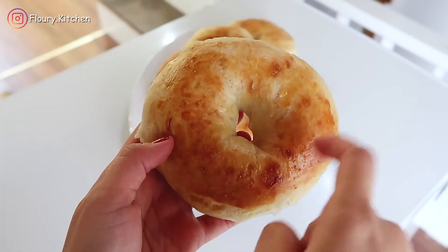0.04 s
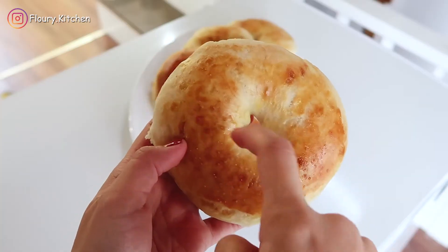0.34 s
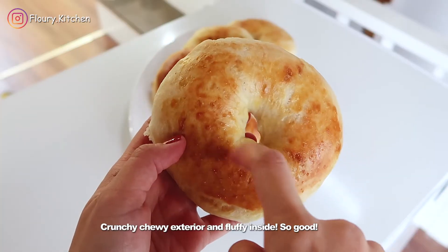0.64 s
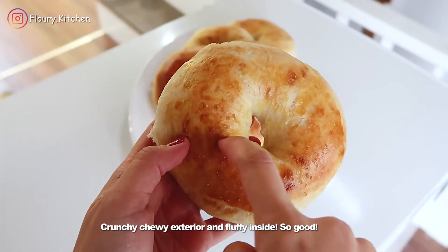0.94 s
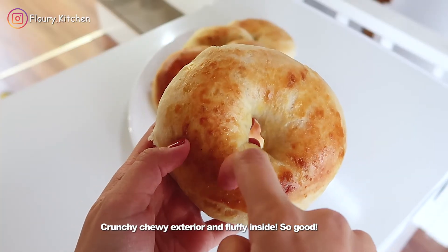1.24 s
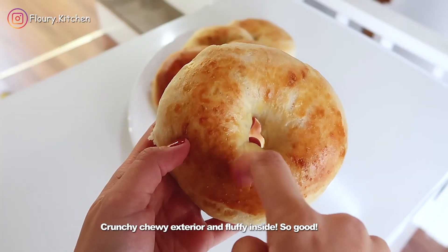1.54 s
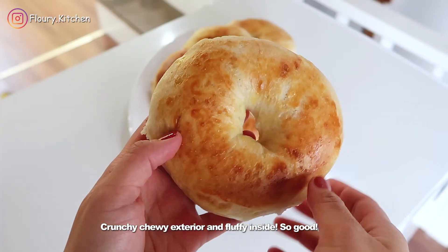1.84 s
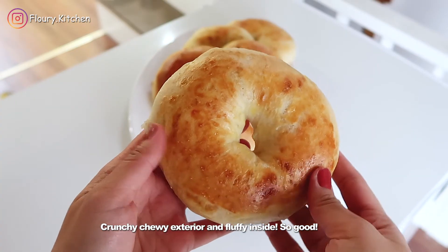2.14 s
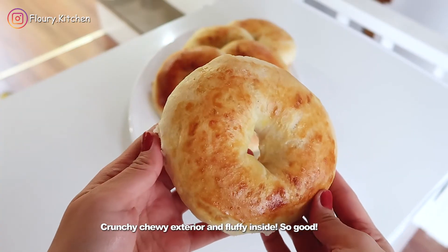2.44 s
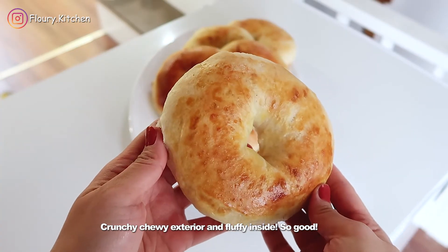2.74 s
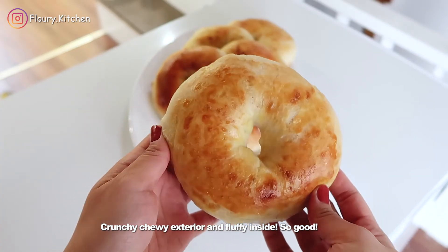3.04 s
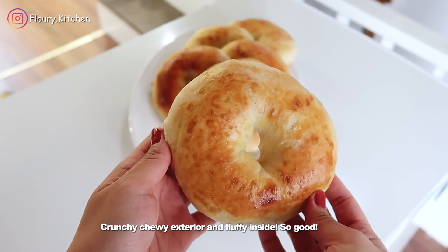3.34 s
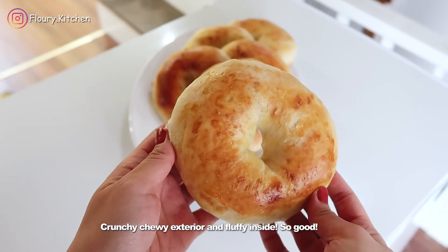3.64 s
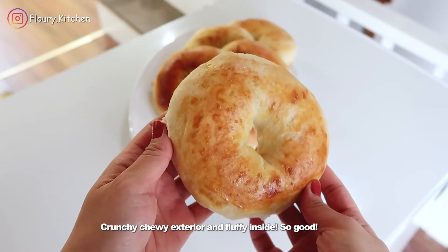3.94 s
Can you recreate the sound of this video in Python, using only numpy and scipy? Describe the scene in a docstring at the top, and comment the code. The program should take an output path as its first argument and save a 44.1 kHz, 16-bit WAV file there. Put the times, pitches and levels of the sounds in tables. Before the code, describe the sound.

Close-up tapping and scratching on a crusty bagel: two soft knocks come first, followed by quick, crackly fingernail strokes. These stop halfway through, leaving a quiet kitchen's low motor hum and soft rush of air.

```python
"""Two dull fingertip knocks on a hand-held bagel, then short, crisp flicks of a nail across its crust.
Each knock is one push that sets the soft crumb ringing. The nail catches and slips on the crust,
and now and then a flake snaps with a sharp click. A quiet kitchen answers faintly,
over a bed of appliance motor hum and a soft rush of air."""
import sys
import numpy as np
from scipy import signal
from scipy.fft import rfft, irfft, next_fast_len
from scipy.io import wavfile
from scipy.ndimage import map_coordinates

SR = 44100
rng = np.random.default_rng(int(sys.argv[2]) if len(sys.argv) > 2 else 0)


def to_wav(sig):
    """Store sig (one row per channel, or 1-D mono) as 16-bit WAV at the path in sys.argv[1].

    Samples outside -1..1 are clipped; the rate is SR.
    """
    pcm = np.clip(np.atleast_2d(sig), -1, 1) * 32767
    pcm = np.round(pcm).astype(np.int16)
    wavfile.write(sys.argv[1], SR, pcm.T)  # frames by channels


N = 176400

# Fingertip knocks. Each row: start in seconds, relative level in dB, brightness in dB per octave.
KNOCK_CUES = [(0.0028, -21, 0.5), (0.1835, -18.5, 0.5)]
# Tone of the fingertip's push. Each row: frequency in Hz, relative level in dB.
KNOCK_EQ = [(40, -20), (130, -1), (300, 9), (550, -1), (900, -0.5), (1500, -13), (3000, -16), (6000, -32),
            (14000, -46)]
# The bagel's modes. Each row: pitch in Hz, relative level in dB, seconds to fade by 60 dB.
CRUMB_MODES = [(198, -41, .06), (350, -34, 0.023), (515, -45, 0.042), (663, -41, 0.055), (850, -39, .06),
               (1450, -42, 0.042)]

# Nail strokes. Each row: firmest moment in seconds, rise and fall in seconds, level in dB,
# brightness in dB per octave, local crust resonance in Hz.
SCRATCH_CUES = [ (0.031, 0.01, 0.017, -39.5, -2, 704), (0.2221, 0.014, 0.012, -39, 0, 2730),
                (0.589, 0.037, 0.017, -48, 3, 1310), (0.613, 0.019, 0.028, -42.5, -0.5, 800),
                (0.632, 0.008, 0.019, -46, -1, 706), (0.867, 0.0084, 0.024, -43, 2.5, 2500),
                (0.886, 0.013, 0.034, -35, 0, 890), (1.011, .014, .016, -42.5, 1, 1400),
                (1.022, .012, 0.01, -42.5, .5, 1000), (1.108, 0.025, .014, -42.5, 1.5, 795),
                (1.121, .008, 0.022, -40.5, 0, 814), (1.289, 0.0049, 0.017, -40, 2, 1400),
                (1.306, 0.023, 0.036, -38.5, 1, 580), (1.423, 0.0045, .020, -40, -0.7, 970),
                (1.494, 0.021, 0.011, -40.5, 3.5, 1280), (1.504, 0.014, 0.015, -36, -0.3, 1100),
                (1.641, .005, 0.027, -47, 1.5, 1200), (1.663, 0.017, 0.022, -39, -0.05, 1660),
                (1.863, 0.0083, 0.022, -44.5, 2, 795), (1.879, 0.024, 0.018, -48, 3, 1670)]
# Tone of the crust. Each row: frequency in Hz, relative level in dB.
CRUST_EQ = [(60, -18.5), (150, -4), (280, 4.5), (550, -0.5), (880, -1), (1300, -1), (1960, -7.5),
            (2850, -10.5), (3650, -16), (4700, -16.5), (6000, -20.5), (8500, -29), (12400, -31.5),
            (15000, -43)]
# Snapping flakes. Each row: start in seconds, relative level in dB, brightness in dB per octave.
SNAP_CUES = [(0.216, -16.5, -3), (0.2211, -19.5, -2), (0.5897, -27, 1.5), (0.6123, -23.5, -4.5),
             (0.6328, -34, 1), (0.8795, -45, -3), (0.888, -31, 6), (0.8942, -23.5, 4), (1.0159, -22.5, 0),
             (1.0235, -30, -1.5), (1.0251, -25.5, 1.5), (1.0896, -21, -1.5), (1.1072, -32, 5.5),
             (1.1209, -30, 0), (1.278, -42, 14), (1.289, -27, 1.5), (1.3034, -19, 1), (1.307, -18.5, 3),
             (1.3357, -23, -8), (1.4203, -24.5, 2), (1.503, -23.5, 1.5), (1.6612, -25, -1.5),
             (1.664, -21.5, -.5), (1.6673, -37, 2)]
# The crust's bending resonances. Each entry: frequency in Hz.
BENDING_HZ = [2100, 2900, 3860, 5200, 6500, 7950, 10000]

# The kitchen's reverb tail. Each row: frequency in Hz, seconds to fade by 60 dB.
ROOM_DECAY = [(150, 0.33), (800, 0.56), (2500, 0.27), (10000, 0.12)]
# Lingering resonances of the surroundings. Each row: pitch in Hz, peak gain in dB.
ROOM_MODES = [(569, -5), (780, -2), (850, -4), (961, -5), (1186, -4), (1443, -5), (1607, 0), (1738, -5),
              (1998, -4)]
# The motor's tones. Each row: pitch in Hz, level in dB.
MOTOR_TONES = [(32.3, -73), (59.2, -49.5), (91.5, -64), (118.4, -70), (177.6, -72), (236.9, -58.5),
               (269.2, -73), (355.3, -72.5), (414.5, -73)]
# Slow swell of the hum. Each row: time in seconds, level in dB (only its offset from the mean counts).
MOTOR_SWELL = [(0.0, -52), (0.04, -49), (0.71, -48.5), (1.46, -50), (2.39, -49.5), (3.2, -49.5),
               (3.97, -49), (4.0, -48.5)]
# Tone of the air. Each row: frequency in Hz, relative level in dB.
AIR_EQ = [(20, -14.5), (45, 0), (80, -5.5), (130, -1), (200, 0.5), (320, 2), (450, -0.5), (650, -4.5),
          (900, -5), (1500, -7.5), (2500, -11), (4000, -14.5), (5200, -17), (8000, -22.5), (12000, -27.5),
          (14000, -31.5), (15000, -49)]
# Stereo image of the air. Each row: frequency in Hz, left-right correlation (1 is mono).
AIR_CORRELATION = [(60, 0.99), (150, 0.56), (300, 0.15), (600, 0.084), (1500, 0.05), (4000, 0.05),
                   (12000, 0.041)]


def knocks():
    """The fingertip gives one dull push; the soft crumb rings briefly."""
    out, t = np.zeros(N), np.arange(SR // 8) / SR
    for start, db, tilt_db in KNOCK_CUES:
        push = click(lambda hz: curve_at(KNOCK_EQ, hz) + tilt_db * octaves(hz))
        crumb = sum(amp(level - 60 * t / t60) * np.sin(2 * np.pi * hz * t)
                    for hz, level, t60 in CRUMB_MODES)
        add(out, start, amp(db + 8.5) * push)
        add(out, start, amp(db) * crumb)
    return out


def scratches(edge_db=18.5, ring_db=5, ring_octaves=0.22, grit_db=-10.5, grit_tilt_db=2):
    """The nail sticks and slips, with fine grit between, as its pressure rises and falls."""
    out, t = np.zeros(N), np.arange(-SR // 10, SR // 10) / SR
    for firmest, rise, fall, db, tilt_db, ring_hz in SCRATCH_CUES:
        def tone(hz):
            ring = ring_db / (1 + (octaves(hz, ring_hz) / ring_octaves) ** 2)
            return curve_at(CRUST_EQ, hz) + tilt_db * octaves(hz) + ring

        pressure = amp(-edge_db * np.maximum(-t / rise, t / fall))
        slips = pressure * nail_slips(t)
        rubbing = pressure * unit_rms(rng.standard_normal(len(t)))
        rasp = signal.fftconvolve(slips, click(lambda hz: tone(hz) + contact_rolloff(hz)))
        grit = signal.fftconvolve(rubbing, click(lambda hz: tone(hz) + grit_tilt_db * octaves(hz)))
        add(out, firmest + t[0], amp(db) * (amp(grit_db) * grit - rasp))
    return out


def nail_slips(t, count=160, slips_per_s=600, scatter=0.4, spread_db=4.5):
    """The nail lets go in a run of tiny jolts, uneven in timing and strength."""
    jitter, sizes = rng.standard_normal((2, count))
    when = (np.arange(count) - count / 2 + scatter * jitter) / slips_per_s
    strength = amp(spread_db * np.minimum(sizes, 1))
    slips = np.bincount(np.searchsorted(t, when), strength, len(t) + 1)[:-1]
    slips[0] = 0  # drop the slips that fall before the stroke
    return unit_rms(slips - slips.mean())


def snaps():
    """A flake gives way with one sharp click through the crust."""
    out = np.zeros(N)
    for start, db, tilt_db in SNAP_CUES:
        snap = click(lambda hz: curve_at(CRUST_EQ, hz) + tilt_db * octaves(hz) + contact_rolloff(hz))
        add(out, start, -amp(db + 2) * snap)
    return out


def contact_rolloff(hz, corner_hz=7500):
    """Treble roll-off in dB of a contact that takes a moment to give way."""
    return -10 * np.log10(1 + (hz / corner_hz) ** 4)


def crust_smear(x, q=5):
    """The crust holds back each click near its bending resonances without changing its colour."""
    def allpass(f, hz):
        resonance = hz * hz - f * f + 1j * f * hz / q
        return np.conj(resonance) / resonance

    return filtered(x, lambda f: np.prod([allpass(f, hz) for hz in BENDING_HZ], axis=0))


def kitchen(x, tail_db=-16.5, early_db=-12.5, early_s=0.0096, width_db=-6):
    """Direct sound, early echoes off the table top, a wide treble and a short tail."""
    hz, frame_s, noise = signal.stft(rng.standard_normal((2, SR // 2)), SR, nperseg=256)
    decay = amp(-60 * frame_s / curve_at(ROOM_DECAY, hz)[:, None])
    tail = signal.istft(noise * decay, SR, nperseg=256)[1]
    t = np.arange(tail.shape[1]) / SR
    # Spiky early echoes for centre, left and right.
    early = rng.standard_normal((3, len(t))) ** 3 * (t / early_s) * np.exp(-2 * t / early_s)
    early /= np.linalg.norm(early, axis=1, keepdims=True)
    room = amp(tail_db) * tail / np.linalg.norm(tail[0]) + amp(early_db) * early[0]
    reverb = signal.fftconvolve(x[None], room, axes=1)
    treble = filtered(x, lambda hz: hz / np.hypot(hz, 3500))
    width = amp(width_db) * signal.fftconvolve(treble[None], early[1:], axes=1)
    return x + (reverb + width)[:, :N]


def room_ring(x, width_hz=15.5):
    """A few narrow resonances of the surroundings linger after every contact."""
    def bandpass(f, hz):
        damping = 1j * f * width_hz
        return damping / (hz * hz - f * f + damping)

    return filtered(x, lambda f: sum(amp(db) * bandpass(f, hz) for hz, db in ROOM_MODES))


def motor_hum(waver_db=1.54, drift_rad=0.12):
    """An appliance motor hums, each tone wavering a little in level and phase."""
    hum, t = np.zeros(N), np.arange(N) / SR
    for hz, db in MOTOR_TONES:
        level = amp(db + waver_db * wobble(2.98))
        phase = 2 * np.pi * (hz * t + rng.random()) + drift_rad * wobble(1.91)
        hum += level * np.sqrt(2) * np.sin(phase)
    times, swell_db = np.transpose(MOTOR_SWELL)
    return amp(np.interp(t, times, swell_db - swell_db.mean())) * hum


def air(level_db=-55):
    """Steady room rush, near mono in the bass and wide in the treble."""
    def mid_side_gains(hz):
        angle = np.arccos(curve_at(AIR_CORRELATION, hz)) / 2
        return amp(curve_at(AIR_EQ, hz)) * [np.cos(angle), np.sin(angle)]

    mid, side = filtered(rng.standard_normal((2, N)), mid_side_gains)
    return amp(level_db) * unit_rms(np.array([mid + side, mid - side]))


def amp(db):
    """Decibels as a gain."""
    return 10 ** (np.asarray(db) / 20)


def unit_rms(x):
    """Scale to an rms of 1."""
    return x / np.sqrt(np.mean(x ** 2) + 1e-20)


def curve_at(points, hz):
    """Read (Hz, value) points on a log frequency axis."""
    freqs, values = np.transpose(points)
    return np.interp(np.log(hz + 1), np.log(freqs + 1), values)


def octaves(hz, ref_hz=1000):
    """Octaves above a reference, held flat below 100 Hz."""
    return np.log2(np.maximum(hz, 100) / ref_hz)


def wobble(knots_per_s):
    """A smooth random modulation curve."""
    position = np.arange(N) * knots_per_s / SR + 2
    return map_coordinates(rng.standard_normal(2048), [position], mode="wrap")


def filtered(x, response):
    """Filter x with the gain response(Hz)."""
    size = next_fast_len(N + SR // 2)
    return irfft(rfft(x, size) * response(np.fft.rfftfreq(size, 1 / SR)), size)[..., :N]


def click(tone_db, size=2048):
    """A minimum-phase click of energy 1, its spectrum shaped by tone_db(Hz)."""
    cepstrum = irfft(np.log(amp(tone_db(np.fft.rfftfreq(size, 1 / SR)))))
    cepstrum[1:size // 2] *= 2
    cepstrum[size // 2 + 1:] = 0
    pulse = irfft(np.exp(rfft(cepstrum)))
    return pulse / np.linalg.norm(pulse)


def add(track, start_s, sound):
    """Mix a sound into the track at its cue."""
    i = round(start_s * SR)
    part = sound[max(-i, 0):max(N - i, 0)]
    track[max(i, 0):][:len(part)] += part


def scene():
    """The bagel up front, the humming kitchen behind it."""
    bagel = knocks() + crust_smear(scratches() + snaps())
    return kitchen(bagel) + room_ring(bagel) + motor_hum() + air()


def record(dry):
    """A brick-wall high cut takes the very top off the mix."""
    return filtered(dry, lambda hz: hz < 14950)


dry = scene()
out = record(dry)
to_wav(out)
```